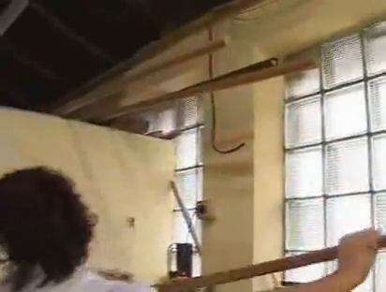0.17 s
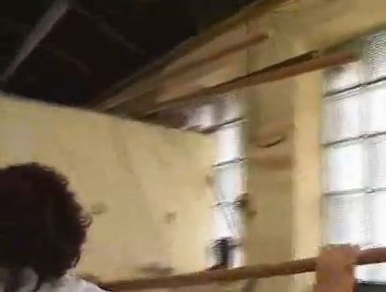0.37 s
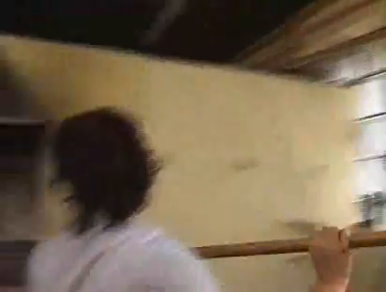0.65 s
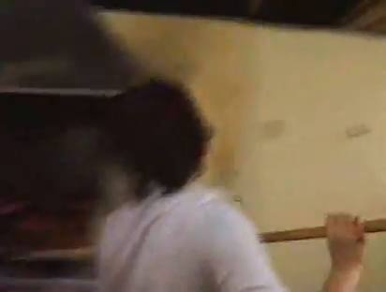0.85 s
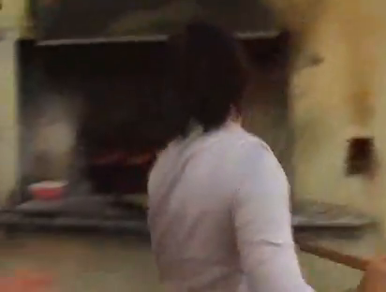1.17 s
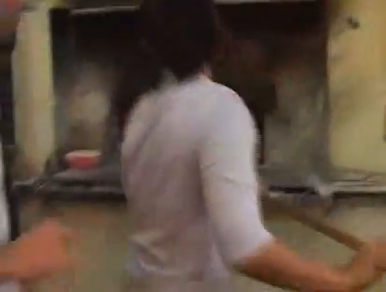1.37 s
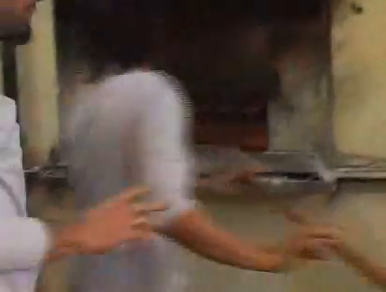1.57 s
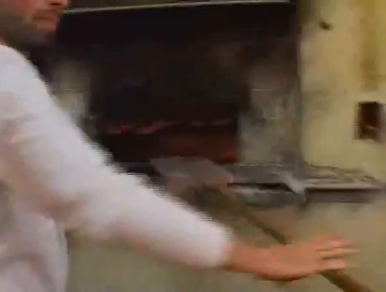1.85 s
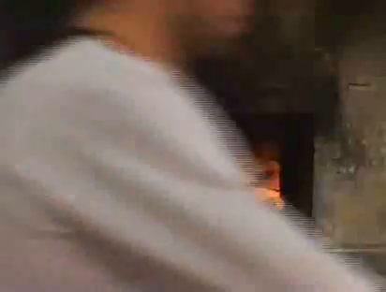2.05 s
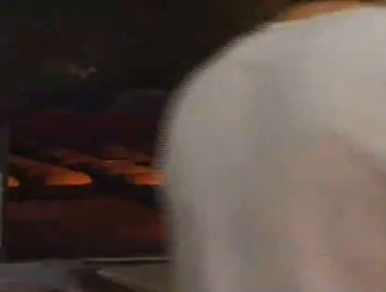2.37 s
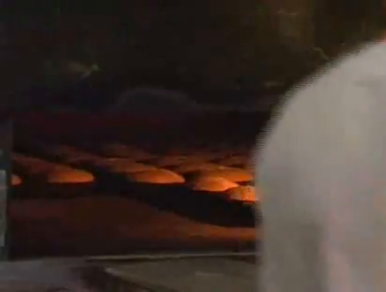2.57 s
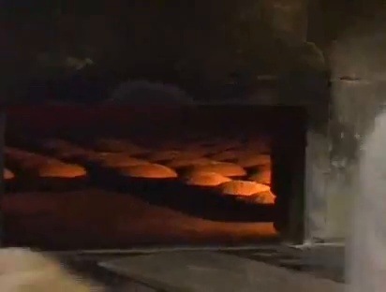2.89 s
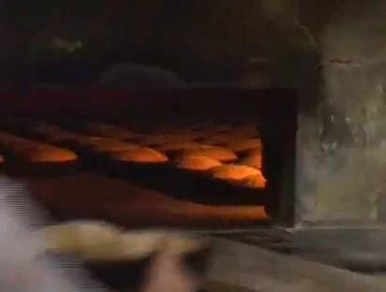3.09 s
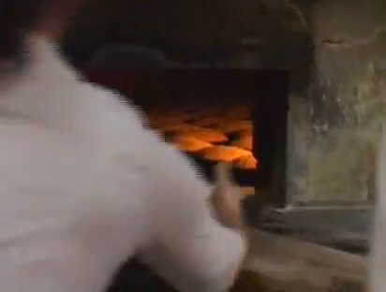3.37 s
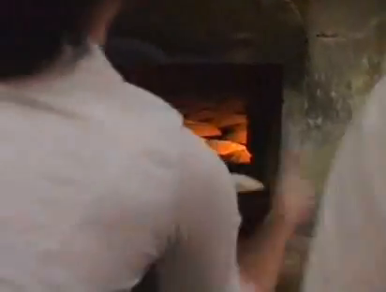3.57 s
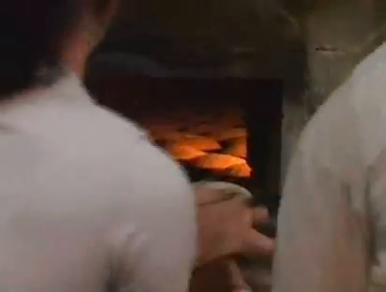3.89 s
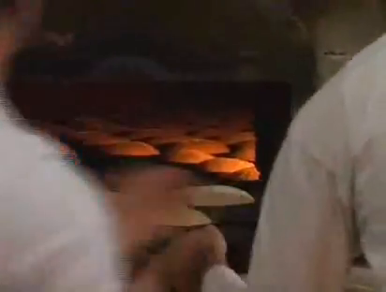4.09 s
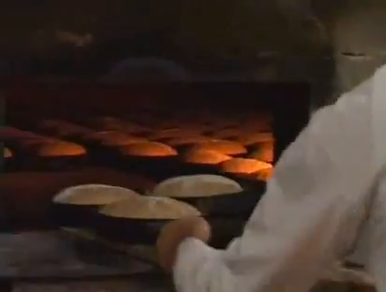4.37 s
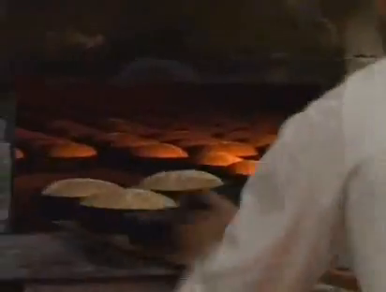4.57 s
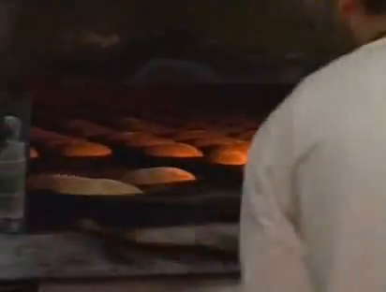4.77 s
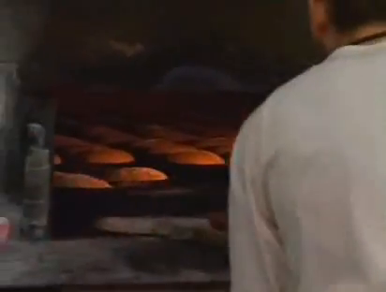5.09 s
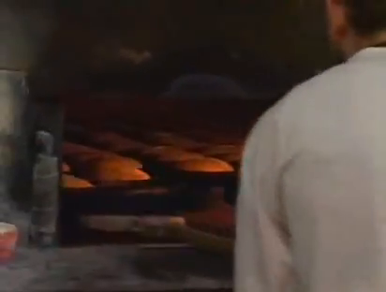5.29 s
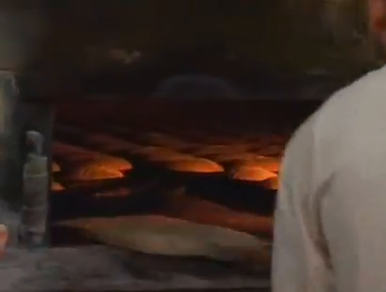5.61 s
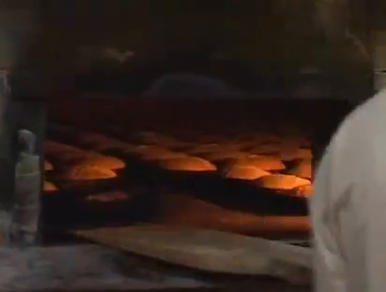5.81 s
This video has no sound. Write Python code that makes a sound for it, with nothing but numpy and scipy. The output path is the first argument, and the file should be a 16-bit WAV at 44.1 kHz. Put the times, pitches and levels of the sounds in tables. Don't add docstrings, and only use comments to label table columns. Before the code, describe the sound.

Sharp wooden cracks and gritty drags of a bread peel at an oven mouth, a tin tray ringing now and then, under tape hiss.

```python
import sys
import numpy as np
from scipy import signal
from scipy.fft import rfft, irfft
from scipy.io import wavfile
from scipy.ndimage import uniform_filter1d

SR = 44100
rng = np.random.default_rng(int(sys.argv[2]) if len(sys.argv) > 2 else 0)


def store_wav(level_fs):
    pcm = np.round(np.clip(np.atleast_2d(level_fs), -1, 1) * 32767)
    wavfile.write(sys.argv[1], SR, pcm.T.astype(np.int16))


def gain_from_db(level_db):
    decades = np.asarray(level_db, float) / 20
    return 10 ** decades


N = 261954

# frequency in Hz, density in dB per Hz.
HISS = [(20, -7), (100, -11), (230, -1), (500, -3.5), (1200, -10), (4000, -14.5), (9000, -17),
        (13000, -18.5)]
# frequency in Hz, gain in dB.
MICROPHONE = [(30, -29), (80, -7), (130, 4.5), (8000, 3), (12800, -3.5), (13300, -53)]
# frequency in Hz, decay time t60 in s, level in dB.
ROOM = [(122, 0.84, -0.5), (300, 0.72, 7), (744, 0.56, 1), (1950, 0.56, 2), (4840, 0.05, 4),
        (10400, 0.12, -63)]
# delay in seconds, level in dB.
WALL_ECHOES = [(.004, -9), (.0082, -11), (.0121, -9), (.0175, -12), (.05, -12)]
# centre in Hz, width in Hz, grains a second, scatter of the grains in dB.
DRAG_PARTS = [
    (320, 380, 1500, 1.6),
    (1350, 1600, 3500, 2.1),
    (3900, 3800, 8000, 1.7),
    (8500, 6500, 14000, 1.2),
]
SQUEAK_HZ = [988, 1398, 1746, 2030, 2443, 3360, 4210]
# start in seconds, rise in s, hold in s, blade level in dB,
# handle rumble in dB above the blade.
DRAGS = [(0, 0.004, .02, -64, -5), (.27, 0.032, 0.18, -70, -14), (.5, .1, 0.018, -52.5, -15),
         (.84, 0.037, 0.18, -42, 1.1), (1.1, 0.03, 0.037, -36, -1), (1.33, 0.043, 0.029, -48, 6.5),
         (1.48, 0.024, 0.013, -40, 8), (1.6, .04, 0.034, -47.5, -4), (1.82, 0.032, 0.24, -57, -5),
         (2.2, 0.054, 0.18, -43.5, 1), (2.47, 0.049, 0.021, -38, 1), (2.83, 0.027, 0.02, -50, -13),
         (3.0, 0.042, .01, -56.5, -8.5), (3.3, 0.046, 0.19, -52.5, -4), (3.62, 0.051, 0.15, -44.5, -16),
         (4.05, 0.056, 0.15, -47.5, -20), (4.3, 0.065, 0.18, -51, -9.5), (4.66, 0.082, 0.089, -39, -15.5),
         (4.85, .05, 0.33, -46.5, -9.5), (5.05, 0.027, 0.15, -47.5, -7), (5.3, 0.033, 0.29, -52, -20),
         (5.53, 0.055, 0.19, -36, -11.5)]
# start in seconds, rise in s, hold in s, grit level in dB,
# flour hiss in dB above the grit.
SWEEPS = [(0, 0.0037, 0.04, -61.5, -6), (.27, .04, 0.17, -68.5, 2), (.49, 0.085, 0.033, -46, -7),
          (.86, 0.061, 0.09, -40, -9), (1.3, 0.061, .04, -46, -0.5), (1.53, 0.036, .01, -44, -3),
          (1.635, 0.017, 0.0099, -45, 6), (1.81, 0.046, .02, -50, -8), (1.98, 0.02, 0.15, -51.5, -6.5),
          (2.13, 0.01, 0.015, -38.5, -4.5), (2.43, 0.059, 0.037, -30, -10), (2.83, 0.02, 0.01, -42.5, -4),
          (3.0, .05, 0.0075, -54, -6), (3.15, 0.062, 0.18, -57.5, 1), (3.35, 0.058, 0.31, -48, -4),
          (3.68, 0.024, 0.13, -50.5, -12), (3.86, 0.061, 0.17, -57, -8), (4.05, 0.14, 0.18, -51.5, -5.5),
          (4.3, 0.089, 0.22, -44, -26), (4.7, 0.026, 0.37, -46, -21), (5.1, 0.036, 0.29, -52, -15),
          (5.3, 0.074, .03, -52.5, 0), (5.42, 0.082, 0.062, -49.5, -2), (5.55, 0.03, 0.23, -39.5, -32)]
# (Hz, dB, decay time t60 in s).
TRAY_RINGS = [(.842, -36, [(580, -.5, .3)]), (1.336, -30, [(1373, -.5, .2), (1739, -4, .2), (280, -8, .5)]),
              (2.5, -33, [(377, -3, .3), (474, -.5, .3)]), (3.317, -31, [(1287, -3, .3), (1432, -3, .3),
              (1550, -1.5, .23), (415, -10, .4)]), (4.41, -47, [(285, -.5, .12)]),
              (3.61, -46, [(1330, -.5, .4)]), (4.019, -31, [(651, 2, .7), (1281, -1, .35), (1985, -1, .3),
              (2304, -5, .2)]), (4.81, -45, [(1707, -.5, .3), (2358, -5, .3)]),
              (4.91, -47, [(2552, -.5, .4)]), (5.15, -44, [(1950, -3, .2), (3380, -.5, .15)]),
              (5.749, -26, [(1174, -12, .3), (1453, -9, .7), (1972, 0, .25), (2400, -8, .13),
              (3375, -6, .14)])]
# centre in Hz, width in Hz, chatter time in s.
RATTLE_PARTS = [
    (340, 450, .009),
    (1050, 1600, .007),
    (2600, 2200, .0055),
    (4900, 3000, .007),
    (8500, 5000, .0015),
]
# frequency in Hz, width in Hz, level in dB (not used).
BOARD_MODES = [(370, 13, -4), (1040, 9.7, 0), (1470, 160, -2), (2310, 12, -7), (3470, 22, -15),
               (3800, 13, -17), (4900, 100, -20), (4800, 450, -24), (5550, 250, -25), (6340, 110, -27)]
# start in seconds, crack level in dB, rattle level in dB,
# brightness in dB per octave, focus on the board in dB per octave squared.
KNOCKS = [(0.839, -11, -11.5, 1.5, 1.77), (0.945, -47, -22, -3.5, 1), (0.955, -9, -12.5, 6, 3.3),
          (1.123, -27, -19, 5.5, 4), (1.157, -10, -10, 11.5, 8), (1.3335, -10.5, -7, -4, 11),
          (1.501, -26, -12, 8, 10), (2.118, -8.5, -2, -6, 10.5), (2.166, -15, -14.5, -4, 3),
          (2.203, -42, -14.5, 3, 11), (2.344, -23.5, -14.5, -5.5, 6.5), (3.315, -13.5, -17.5, -0.5, 6),
          (3.608, -37.5, -27.5, 0.5, 9), (3.734, -24, -23, 7.5, 2.1), (4.017, -20.5, -13, -1.5, 7),
          (4.034, -21, -15, -6, 10.5), (4.567, -24, -25.5, 31.5, 25), (4.711, -17, -22, 4, 2.5),
          (5.529, -27.5, -21.5, -0.5, 11), (5.578, -21.5, -31, 7.5, 3), (5.606, -42, -20, 7.5, 2.3),
          (5.639, -52, -24, -3.5, 2), (5.746, -20, -17, 23, 18)]
# start in seconds, crack level in dB, rattle level in dB,
# brightness in dB per octave.
TICKS = [(0.075, -42, -49, 3), (0.417, -50, -85, 25.5), (0.462, -37, -59, 14.5), (0.771, -43, -70, 21),
         (1.013, -45, -59, 14), (1.993, -46, -39.5, 4), (2.33, -22.5, -32, -14.5), (2.804, -49, -40, -2),
         (4.409, -48, -38, -4.5), (4.81, -38, -32.5, 8), (4.978, -27, -42, 8), (5.151, -21, -36, 5.5),
         (5.403, -19.5, -41, 6.5), (5.595, -18.5, -31, 1.7)]


def colour(x, points):
    hz, db = np.transpose(points)
    size = 4096
    bins_hz = np.arange(size // 2 + 1) * SR / size
    log_gain = np.interp(np.log(bins_hz + 1), np.log(hz), db) * np.log(10) / 20
    cepstrum = irfft(log_gain)
    cepstrum = np.r_[cepstrum[0], 2 * cepstrum[1:size // 2], np.zeros(size // 2)]
    response = irfft(np.exp(rfft(cepstrum)))[:size // 2]
    return signal.fftconvolve(x, response)[:len(x)]


def resonance(x, hz, width):
    return signal.lfilter(*signal.iirpeak(hz, hz / width, fs=SR), x)


def unit(x):
    return x / np.sqrt(np.mean(x ** 2))


def walk(rate):
    k = int(SR / rate)
    return uniform_filter1d(np.repeat(rng.standard_normal(N // k + 1), k), k)[:N]


def add(track, s, x):
    i = int(s * SR)
    track[i:i + len(x)] += x[:N - i]


def tape_hiss():
    return unit(colour(rng.standard_normal(N), HISS)) * gain_from_db(-59)


def room():
    t = np.arange(SR * 3 // 4) / SR
    centres = 90 * 2 ** np.arange(0, 7.2, .5)
    bands = np.array([resonance(rng.standard_normal(3 * SR), hz, hz / 1.6) for hz in centres])
    hz, room_t60, room_db = np.transpose(ROOM)
    t60 = np.interp(np.log(centres), np.log(hz), room_t60)[:, None]
    db = np.interp(np.log(centres), np.log(hz), room_db)[:, None]
    build_up = 1 - np.exp(-t / 0.00077)
    early_boost = 1 + 1.29 * np.exp(-t / 0.0077)
    fade = gain_from_db(db - 60 * t / t60) * build_up * early_boost

    def tail():
        start = rng.integers(2 * SR)
        near = np.zeros(len(t))
        for s, echo_db in WALL_ECHOES:
            near[int(s * SR * rng.uniform(.8, 1.2))] = gain_from_db(echo_db) * rng.choice([-1, 1])
        dense = np.sum(fade * bands[:, start:start + len(t)], axis=0)
        return uniform_filter1d(near, size=5) + gain_from_db(-30) * dense
    return tail


def strokes(table, fade_db_per_s):
    t = np.arange(0, N, 32) / SR
    start, rise, hold, db, second_db = np.array(table).T[:, :, None]
    top = start + np.maximum(rise, .004)
    swell_db = -19.5 * np.maximum(top - t, 0) / (top - start)
    shape_db = swell_db - fade_db_per_s * np.maximum(t - top - np.abs(hold), 0)
    powers = [np.sum(gain_from_db(shape_db + d) ** 2, axis=0) for d in (db, db + second_db)]
    return [np.interp(np.arange(N) / SR, t, power) for power in powers]


def drag():
    blade, rumble = strokes(DRAGS, fade_db_per_s=99.5)
    grit, flour = strokes(SWEEPS, fade_db_per_s=125)
    levels = np.sqrt([rumble, blade, grit, flour])
    out, slip = 0, walk(40)
    for (hz, width, rate, scatter_db), level in zip(DRAG_PARTS, levels):
        caught = rng.random(N) < rate / SR
        grains = caught * rng.standard_normal(N) * gain_from_db(scatter_db * rng.exponential(size=N))
        squeaks = sum(gain_from_db(-3 + 6 * walk(14)) * resonance(grains, f, 55) for f in SQUEAK_HZ)
        part = resonance(grains + squeaks, hz, 1.25 * width)
        part = unit(resonance(part, hz, 1.25 * width))
        uneven_db = 1.6 * slip + 1.4 * walk(60)
        out = out + part * level * gain_from_db(uneven_db)
    return out


def tray():
    track, t = np.zeros(N), np.arange(SR) / SR
    onset = 1 - np.exp(-t / 0.00033)
    for s, db, modes in TRAY_RINGS:
        for hz, mode_db, t60 in modes:
            wave = np.sin(2 * np.pi * hz * t + .4 * walk(50)[:SR])
            wave = wave * gain_from_db(1.5 * walk(60)[:SR])
            add(track, s, gain_from_db(db + mode_db - 60 * t / t60) * wave * onset)
    return track


def blows(tail):
    track, t = np.zeros(N), np.arange(SR // 8) / SR
    push = np.diff(np.exp(-(t / .00004 - 2) ** 2), prepend=0)
    octaves = np.log2(np.array(RATTLE_PARTS)[:, 0] / 1050)
    ticks = [(s, crack_db - 4, rattle_db, bright_db, 3.1) for s, crack_db, rattle_db, bright_db in TICKS]
    for s, crack_db, rattle_db, bright_db, focus_db in list(KNOCKS) + ticks:
        part_db = rattle_db + bright_db * octaves - focus_db * octaves ** 2
        lumps = gain_from_db(3 * np.repeat(rng.standard_normal(len(t) // 50 + 1), 50)[:len(t)])
        chatter = rng.standard_normal(len(t)) * lumps
        stir_db = 4 * rng.standard_normal(len(BOARD_MODES))
        rattle, crack = 0, .2 * gain_from_db(part_db[3]) * push
        for (hz, width, time), db in zip(RATTLE_PARTS, part_db):
            shake = chatter * np.exp(-t / time)
            shake = shake + sum(gain_from_db(-22.5 + d) * resonance(shake, f, 45 + w)
                                for (f, w, _), d in zip(BOARD_MODES, stir_db))
            part = resonance(resonance(shake, hz, width), hz, width)
            rattle = rattle + gain_from_db(db - 16.5) * part * np.sqrt(time * SR / np.sum(part ** 2))
            snap = resonance(resonance(push, hz, width), hz, width)
            snap = resonance(snap, hz, 1.4 * width) / 4
            crack = crack + gain_from_db(db) * np.sqrt(SR / width) * (1000 / hz) * snap
        crack = gain_from_db(crack_db + 3) * crack / np.abs(crack).max()
        add(track, s + .0008, crack + rattle)
        add(track, s + .0008, signal.fftconvolve(rattle + .6 * crack, tail()))
    return track


def scene():
    tail = room()
    rub, rings = drag(), tray()
    answer = signal.fftconvolve(gain_from_db(-18.5) * rub + gain_from_db(-19) * rings, tail())[:N]
    mid = blows(tail) + rub + rings + answer
    return np.array([mid, mid])


def flickering_side(mid):
    hz, _, cells = signal.stft(mid, SR, nperseg=2048)
    patches = np.repeat(rng.random((65, cells.shape[1])), 16, axis=0)[:len(hz)]
    share = .9 * np.clip(1.25 - hz / 9000, 0, 1)[:, None]
    patches = patches < share * rng.random(cells.shape[1]) ** 1.5
    turned = cells * patches * np.exp(1.9j * rng.standard_normal(cells.shape))
    return gain_from_db(-17.0) * signal.istft(turned, SR, nperseg=2048)[1][:N]


def roll_off(x):
    return signal.sosfilt(signal.butter(12, 13000, fs=SR, output="sos"), x)


def record(dry):
    end_s = 5.911
    end_drop = np.clip((end_s - np.arange(N) / SR) / 0.0021, .02, 1)
    mid = colour(.78 * np.tanh(dry[0] / .78), MICROPHONE) * end_drop
    mid = mid + tape_hiss()
    top = signal.ellip(8, .2, 70, 12750, fs=SR, output="sos")
    mid = signal.sosfilt(top, mid)
    side = flickering_side(mid)
    return roll_off(np.array([mid + side, mid - side]))


dry = scene()
out = record(dry)
store_wav(out)
```